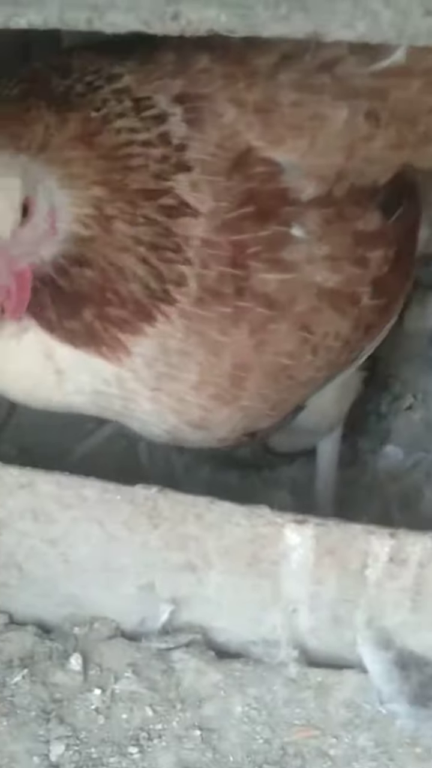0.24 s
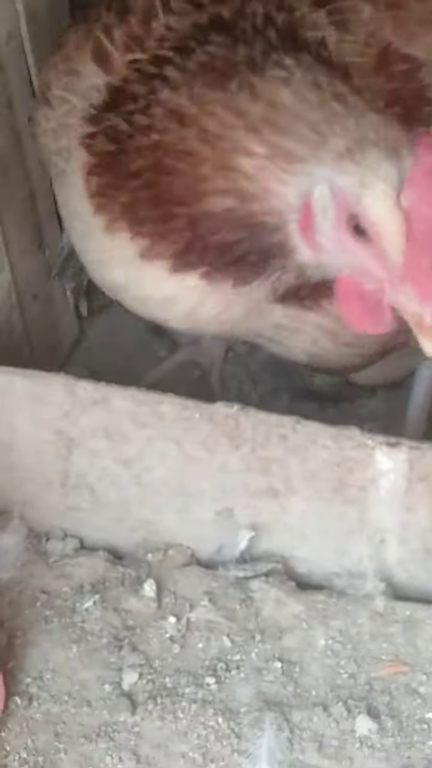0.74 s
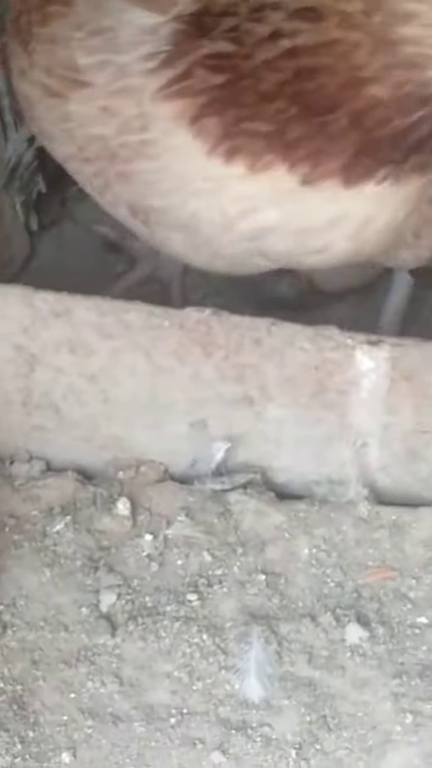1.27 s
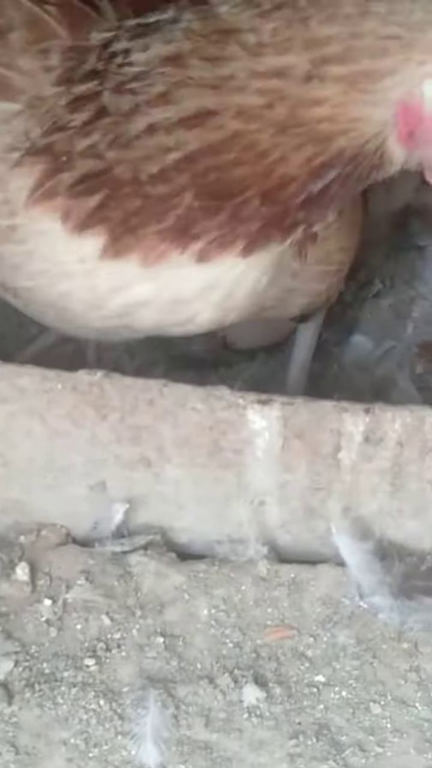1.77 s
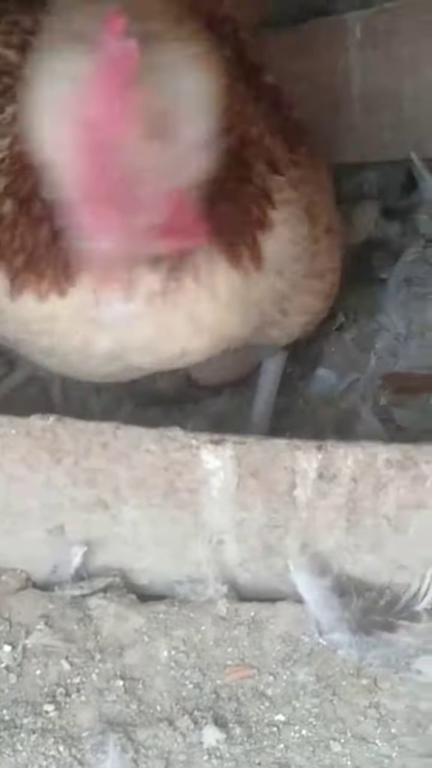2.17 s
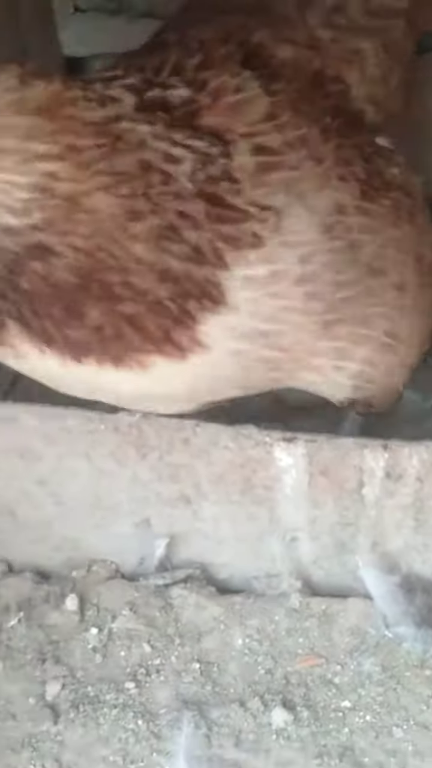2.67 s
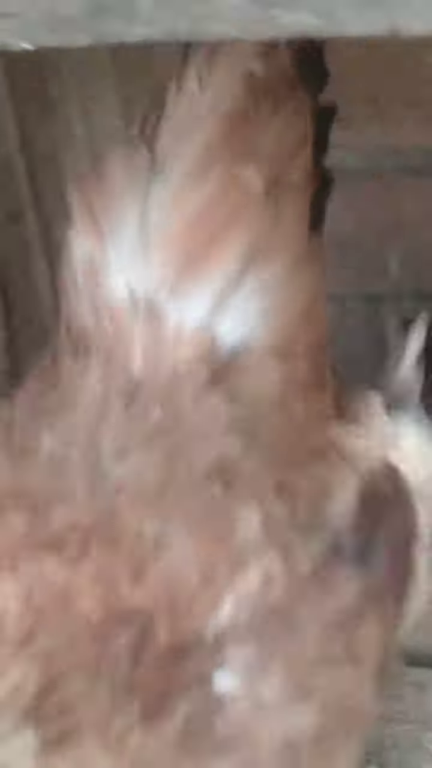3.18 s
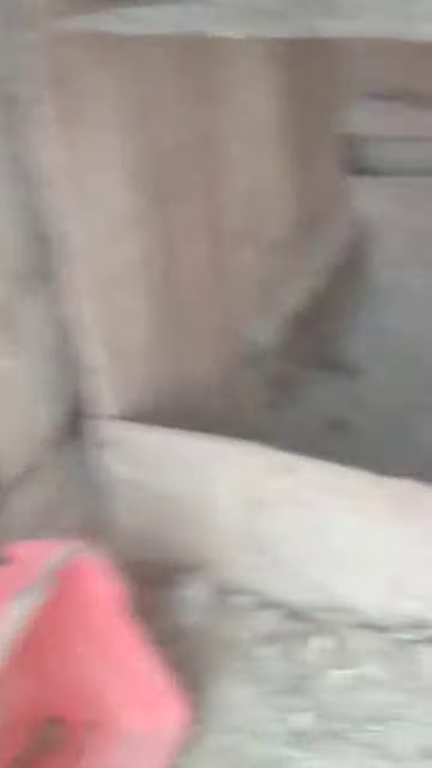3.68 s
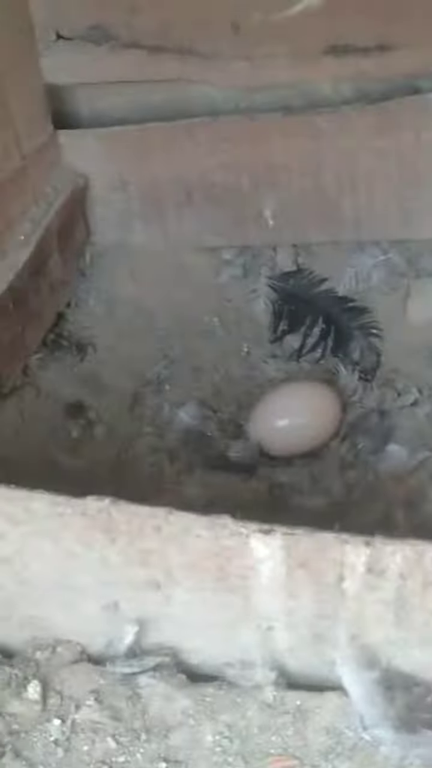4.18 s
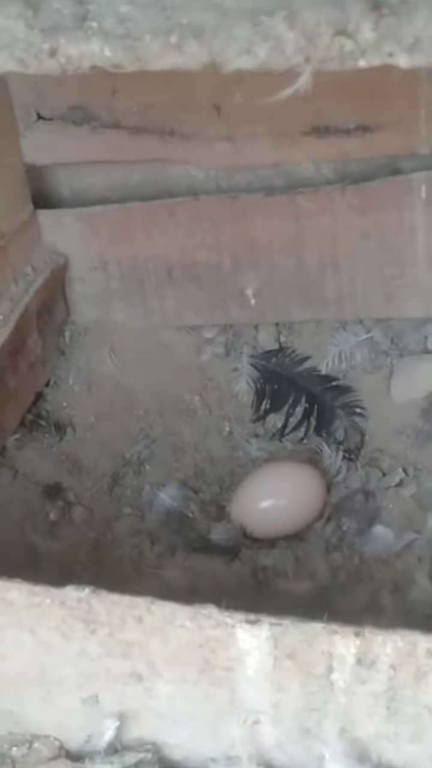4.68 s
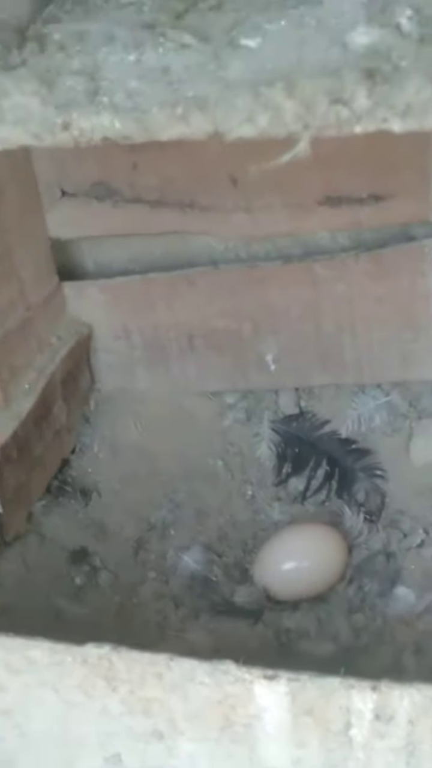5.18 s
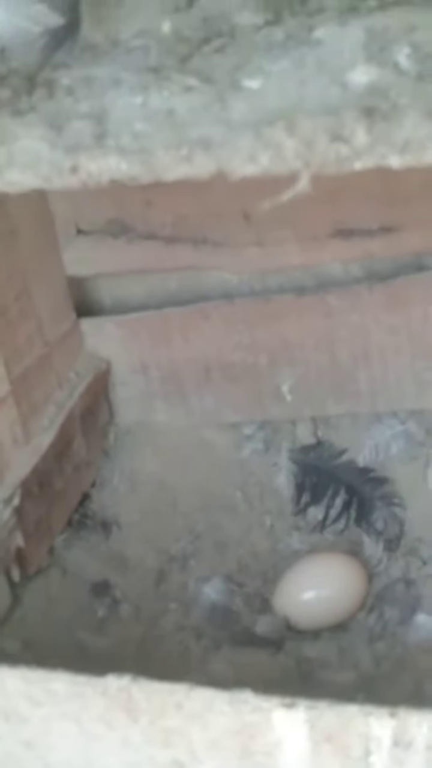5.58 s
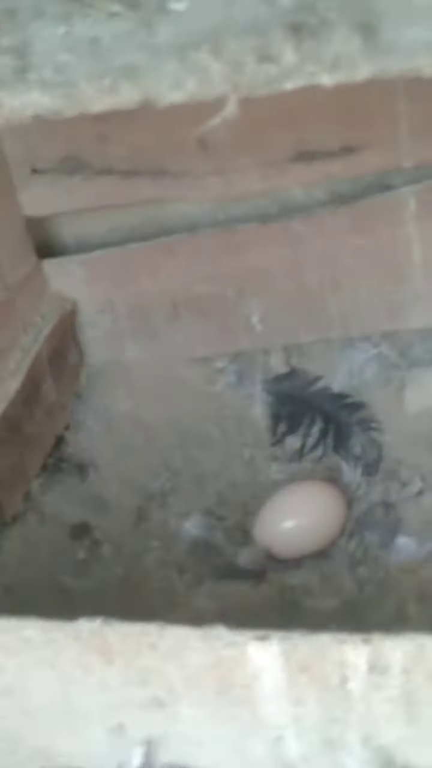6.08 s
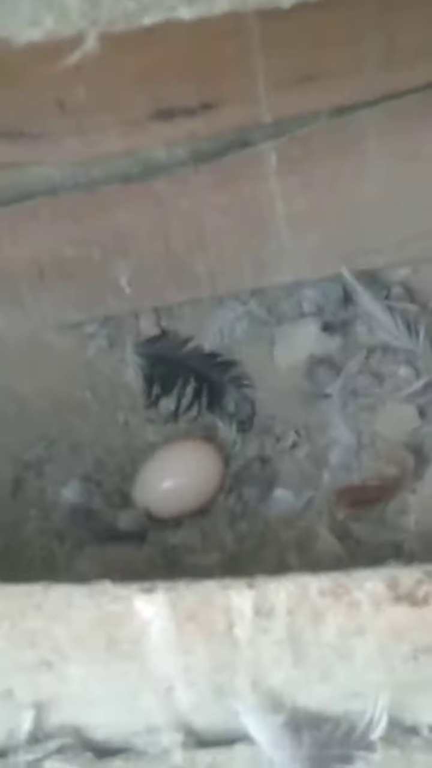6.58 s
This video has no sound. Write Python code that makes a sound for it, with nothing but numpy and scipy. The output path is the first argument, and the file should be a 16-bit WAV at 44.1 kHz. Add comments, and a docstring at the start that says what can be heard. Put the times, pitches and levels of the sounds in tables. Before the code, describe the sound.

For the first two seconds there is only soft outdoor air and a low, gently swelling rumble, with a faint far bird note at the start, a few tiny taps and a brief low swell near 1.2. A small cluck at 1.9 leads to a loud, bright squawk at 2.2-2.3. Short, round clucks follow at 2.45, 2.6, 2.8 and 3.0, close and ringing in the wooden box, with a sharp tick near 3.1. From 3.2 to 3.6 she rises with hoarse, broken squawks and a strong cluck. Small knocks and a soft thud come around 3.7-4.1. Now farther off, she cackles with raspy clucks and a cry at 4.3, a high falling squawk at 5.0 and a longer one at 5.3-5.6, echoing in the coop. A distant motor hums past, nearest around 5.7, while faint, evenly spaced clucks continue to the end near 6.8.

```python
"""Soft air and a low rumble, a far bird's faint note, a few small taps; then a hen clucks in a wooden nest box.
She squawks, steps out into the coop and cackles on from farther off as a distant motor hums past.
Her syrinx pulses and puffs of air pass throat and beak, breaking between clean notes and hoarse rasps.
First the box rings with her voice, then the coop echoes it; a limiter ducks the loudest cries."""
import sys
import numpy as np
from scipy import signal
from scipy.fft import rfft, irfft, next_fast_len
from scipy.io import wavfile
from scipy.ndimage import uniform_filter1d, minimum_filter1d, map_coordinates

SR = 44100
rng = np.random.default_rng(int(sys.argv[2]) if len(sys.argv) > 2 else 0)


def inscribe(sig):
    """Save sig as 16-bit PCM at rate SR to the path in sys.argv[1].

    A 1-D sig is mono; a 2-D sig holds one channel per row.
    Samples are clipped to [-1, 1] before scaling.
    """
    pcm = np.round(np.clip(np.atleast_2d(sig).T, -1, 1) * 32767)
    wavfile.write(sys.argv[1], SR, pcm.astype(np.int16))


N = 301574
TIME = np.arange(N) / SR
EDGE_HZ = 15900  # upper band limit
RISES_S, LEAVES_S, MOVE_WIDTH_S = 3.225, 3.586, 0.3  # she gets up, then clears the box; tanh width of each move
MOTOR_NEAREST_S = 5.71


def amp(db):
    """Decibels to gain."""
    return 10 ** (np.asarray(db) / 20)


def unit(x):
    """Scales to rms 1."""
    return x / np.sqrt(np.mean(x ** 2) + 1e-20)


def curves(rows, t):
    """The columns of a time table, read at times t."""
    s, *columns = np.transpose(rows)
    return [np.interp(t, s, c) for c in columns]


def read(points, hz):
    """A spectrum table on a log-frequency axis."""
    f, value = np.transpose(points)
    return np.interp(np.log(hz + 1), np.log(f), value)


def colour(x, points):
    """Filters x by a spectrum table."""
    size = next_fast_len(len(x) + 1024)
    gain = amp(read(points, np.fft.rfftfreq(size, 1 / SR)))
    return irfft(rfft(x, size) * gain, size)[:len(x)]


def wander(size, rate_hz):
    """Smooth chance of rms 1, no faster than about rate_hz."""
    knots = rng.standard_normal(4096)
    return unit(map_coordinates(knots, [np.arange(size) * rate_hz * 2 / SR], order=3, mode="wrap"))


def step(t, at_s, width_s):
    """A smooth move from 0 to 1 around a moment."""
    return 0.5 + 0.5 * np.tanh((t - at_s) / width_s)


def bell(at_s, width_s):
    """A smooth swell to 1 and back; the half width is to 1/e."""
    return np.exp(-((TIME - at_s) / width_s) ** 2)


def resonate(x, hz, width_hz):
    """A resonance of gain 1 that follows hz: shift down to 0 Hz, lowpass, shift back."""
    turn = np.exp(2j * np.pi * np.cumsum(hz * np.ones(len(x))) / SR)
    r = np.exp(-np.pi * width_hz / SR)
    return 2 * (turn * signal.lfilter([1 - r], [1, -r], x / turn + 1e-18)).real


def formant(x, hz, width_hz):
    """A resonance applied twice, for steep skirts."""
    return resonate(resonate(x, hz, width_hz), hz, width_hz)


def add(mix, s, sound):
    """Mixes a sound in at time s."""
    part = mix[round(s * SR):][:len(sound)]
    part += sound[:len(part)]


# relative spectrum of outdoor air: freq_hz [Hz], density_db [dB per Hz]
AIR_SPECTRUM = [(70, -34.5), (125, -8), (156, -2), (258, -8.5), (357, -20.5), (503, -13.5), (1200, -15.5),
                (2790, -24), (3850, -29.5), (4750, -33.5), (7500, -42.5), (10000, -43.5), (13000, -38.5),
                (15500, -48)]
# relative spectrum of the rumble: freq_hz [Hz], gain_db [dB]
RUMBLE_SPECTRUM = [(15, -42), (28, 3.5), (46, 1), (75, 8), (98, -1.5), (122, -12), (160, -18.5), (250, -16),
                   (400, -49.5), (1000, -86)]
# broad swells of the rumble: peak_s [s], half_width_s [s], swell_db [dB]
RUMBLE_GUSTS = [(1.4, 1, 5.5), (4.85, 0.29, 4.5), (5.8, .4, 3)]
# relative spectrum of the drone: freq_hz [Hz], gain_db [dB]
DRONE_SPECTRUM = [(100, -17), (150, 6), (200, -4), (260, -0.5), (400, -20), (1200, -50.5)]
AIR_DB, RUMBLE_DB, RUMBLE_WANDER_DB = -55.5, -48.5, 0.1
DRONE_DB, DRONE_SWELL_S = -56.5, 2.2
BUMP_S, BUMP_WIDTH_S, BUMP_DB = 1.16, 0.15, -48.5  # brief early swell of the drone


def background(linger_s=0.93):
    """Coloured noises: outdoor air, swelling rumble, and a drone that comes with the motor but slower."""
    air = amp(AIR_DB + 0.17 * wander(N, 6.4)) * unit(colour(rng.standard_normal(N), AIR_SPECTRUM))

    gusts_db = sum(db * bell(s, width_s) for s, width_s, db in RUMBLE_GUSTS)
    rumble_db = RUMBLE_DB + gusts_db + RUMBLE_WANDER_DB * wander(N, 1.49)
    rumble = amp(rumble_db) * unit(colour(rng.standard_normal(N), RUMBLE_SPECTRUM))

    drone_gain = amp(DRONE_DB) * bell(MOTOR_NEAREST_S + linger_s, DRONE_SWELL_S)
    drone_gain += amp(BUMP_DB) * bell(BUMP_S, BUMP_WIDTH_S)
    drone = drone_gain * unit(colour(rng.standard_normal(N), DRONE_SPECTRUM))
    return air + rumble + drone


def far_call(start_s=0.0404, length_s=0.366, hz=1250, db=-59):
    """A faint note from another bird far away: noise blurred around one pitch."""
    out, size = np.zeros(N), round(length_s * SR)
    note = unit(formant(rng.standard_normal(size), hz, 27))
    add(out, start_s, amp(db) * note * signal.windows.tukey(size, 0.4))
    return out


# taps, scuffs and soft thuds, and a faint far call at 1.976 s:
# start_s [s], level_db [dB before decay], centre_hz [Hz], width_hz [Hz], decay_s [s to 1/e]
TAP_EVENTS = [(0.106, -56, 4150, 3500, 0.066), (0.801, -59.5, 5000, 6000, 0.0061),
              (1.091, -59.5, 3500, 4000, .01), (1.976, -57, 2440, 800, .05),
              (2.689, -62, 6920, 7000, 0.0054), (3.061, -24, 2260, 900, 0.0023),
              (3.679, -51, 5000, 6070, 0.0071), (3.855, -39, 822, 600, 0.044), (3.86, -53, 240, 70, 0.026),
              (3.884, -46, 2500, 1300, 0.022), (4.091, -51, 230, 69, 0.044), (5.97, -49, 2952, 700, 0.023)]


def taps():
    """Short dying bursts of noise in one broad resonance: taps, scuffs, thuds and one faint far call."""
    out, t = np.zeros(N), np.arange(SR // 2) / SR
    for start_s, level_db, centre_hz, width_hz, decay_s in TAP_EVENTS:
        noise = colour(rng.standard_normal(len(t)), VOICE_SPECTRUM)
        burst = unit(formant(noise, centre_hz, width_hz))
        add(out, start_s, amp(level_db) * burst * np.exp(-t / decay_s))
    return out


# windpipe and beak resonances above the moving throat, before each call's factors:
# freq_hz [Hz], width_hz [Hz], gain_db [dB]
BEAK_RESONANCES = [(1983, 205, -1.5), (2549, 318, -0.5), (4130, 430, -6), (4640, 794, -10.5),
                   (5725, 440, -15.5)]
# overall colour of the voice: freq_hz [Hz], gain_db [dB]
VOICE_SPECTRUM = [(150, -57.5), (330, -10), (550, -3), (1200, 2), (4000, -4.5), (6500, -5), (9000, -4),
                  (13000, 3), (16000, -5.5)]


def voice(level_db, hz, rough, throat_hz, bright_db, fundamental_db, beak=1, damping=1, jitter=0.048,
          rasp=0.41, rasp_hz=130, breath=0.9, throat_width_hz=560, leak_db=-45, split=0.73):
    """Syrinx pulses and puffs of air pass throat and beak; a hoarse voice jitters and rattles."""
    size, rough = len(hz), np.clip(rough, 0, 1)
    turns = np.cumsum(hz * (1 + (0.0012 + jitter * rough) * wander(size, 240))) / SR

    pulses = np.zeros(size)
    for k in range(1, 30):
        phase = 2 * np.pi * k * turns - np.pi * k ** 2 / 10  # the long windpipe spreads each pulse
        pulses += np.cos(phase) * (k * hz < EDGE_HZ) / k ** 0.14
    pulses = unit(pulses)
    # strong and weak pulses alternate: lines at half the pitch
    pulses *= 1 + np.minimum(split * rough, 0.8) * np.cos(np.pi * turns)

    # air escapes once a cycle
    puffs = unit((0.4 + np.exp(-(turns % 1) / 0.14)) * rng.standard_normal(size))
    drive = (1 - 0.79 * rough) * pulses + (0.019 + breath * rough) * puffs

    rattle_turns = np.cumsum(rasp_hz * (1 + 0.17 * wander(size, 40.4))) / SR
    rattle = 1 + rasp * rough * np.sin(2 * np.pi * rattle_turns)

    low = formant(drive, throat_hz, throat_width_hz) + amp(fundamental_db) * formant(drive, hz, 400)
    high = amp(leak_db) * drive
    for freq_hz, width_hz, gain_db in BEAK_RESONANCES:
        high = high + amp(gain_db) * formant(drive, freq_hz * beak, width_hz * damping)
    sound = colour(low + amp(bright_db) * high, VOICE_SPECTRUM)

    # level the short-term power, so that level_db and the rattle shape it
    steady = sound / np.sqrt(abs(uniform_filter1d(sound ** 2, size=260)) + 1e-9)
    return amp(level_db) * steady * rattle * signal.windows.tukey(size, 260 / size)


# clucks: peak_s [s], level_db [dB, relative], top_pitch_hz [Hz], length_s [s], throat_hz [Hz],
# bright_db [dB, relative], beak [factor on beak resonances]
CLUCK_EVENTS = [(1.933, -31.5, 431, 0.037, 905, -31, 1.02), (2.116, -23.5, 559, 0.039, 814, -7.5, 0.86),
                (2.454, -10, 623, 0.045, 1077, -2, 0.898), (2.609, -16, 579, 0.045, 1200, -3, 0.88),
                (2.801, -21, 555, 0.043, 1196, -8.5, 1.07), (3.008, -25, 528, 0.042, 1060, -2.5, 1.05),
                (3.395, -14.5, 846, .064, 1060, 1, 0.84), (3.727, -34.5, 655, 0.11, 955, -0.5, 1.02),
                (3.922, -27.5, 569, 0.065, 1127, -8, 1.08), (4.128, -26, 607, .06, 1120, -19.5, 1),
                (4.471, -27.5, 605, 0.086, 1206, -6.5, .88), (4.56, -35.5, 736, .11, 725, 2.5, 0.87),
                (4.673, -26, 555, 0.088, 1090, -1, 0.83), (4.824, -33.5, 537, 0.1, 840, -4, 0.82),
                (4.888, -24, 605, 0.061, 1206, -5.5, 0.793), (5.737, -32, 606, .09, 1030, 1.5, 0.99),
                (5.951, -36.5, 567, 0.13, 1048, -4.5, 0.94), (6.143, -34.5, 616, 0.082, 1164, -3.5, 0.84),
                (6.336, -33.5, 605, 0.083, 1150, -6, 1.23), (6.527, -35.5, 539, 0.12, 1010, -2.5, 1.02),
                (6.743, -35, 603, 0.11, 950, -2.5, 1.02)]
# half-shut beak: freq_hz [Hz], gain_db [dB]
CLUCK_SPECTRUM = [(300, 7.5), (700, 3.5), (1200, -0.5), (2000, 1.5), (3700, 4), (5500, 0), (7000, 4.5),
                  (10000, 0.5), (14000, 3)]
# on the nest, then once she is up
CALM_RISE, ALARMED_RISE = 0.58, 0.48  # share of length spent swelling
CALM_ROUGH, ALARMED_ROUGH = 0.27, 0.64  # base roughness, 0-1


def clucks(scoop=0.18, sag=0.05, closing_db=1.5, fundamental_db=-9):
    """Each cluck swells and shuts; pitch scoops up to its top, and the closing beak dulls the end."""
    out = np.zeros(N)
    for peak_s, level_db, top_hz, length_s, throat_hz, bright_db, beak in CLUCK_EVENTS:
        alarm = step(peak_s, RISES_S, MOVE_WIDTH_S)
        rise_s = length_s * (CALM_RISE + (ALARMED_RISE - CALM_RISE) * alarm)
        fall_s = length_s - rise_s
        t = np.arange(-rise_s, fall_s, 1 / SR)
        stage = 2.15 * t / np.where(t < 0, rise_s, fall_s)  # negative while it swells
        arch = 1 / (1 + np.where(t < 0, scoop, sag) * stage ** 2)

        rough = CALM_ROUGH + (ALARMED_ROUGH - CALM_ROUGH) * alarm
        hoarse = rough + 0.14 * np.maximum(-stage, 0)  # the note catches roughly
        shine_db = bright_db - 2.5 - 2.8 * stage ** 2 - closing_db * stage
        swell_db = level_db - 10 * abs(stage) ** 1.3
        note = voice(swell_db, top_hz * arch, hoarse, throat_hz * arch, shine_db,
                     fundamental_db - 14 * rough, beak, damping=0.79, jitter=0.06, breath=0.95,
                     throat_width_hz=570, leak_db=-59)

        # only a sharp cluck reaches the top octave
        mellow = colour(note, [(5500, -1.0), (6800, -16.5)])
        add(out, peak_s + t[0], mellow + amp(-1.5 + 0.84 * bright_db) * (note - mellow))
    return colour(out, CLUCK_SPECTRUM)


# squawks: clears_s [s], breaks_s [s], rough [0-1], push_db [dB], throat [multiple of pitch],
# beak [factor on beak resonances], bright_db [dB], opening_db [dB brightness per s], fundamental_db [dB]
SQUAWK_EVENTS = [(2.205, 2.328, .04, 11.5, 2.03, 1.019, -0.5, 15, -26.5),
                 (3.259, 3.38, 0.52, -3.5, 1.15, 0.92, 5, 12, 2),
                 (3.488, 3.575, 0.43, 11, 2.2, 0.9, -1, -8, -20.5),
                 (4.273, 4.401, 0.18, -.5, 1.55, .96, 3, 9, -4),
                 (4.988, 5.069, 0.2, -2.5, 2.02, 0.96, 0.5, 8, -9),
                 (5.364, 5.567, 0.08, -1.5, 1.97, 1.067, 1, -10, -7.5)]
# course of each squawk: time_s [s], level_db [dB before push], pitch_hz [Hz]
SQUAWK_COURSES = [
    [(2.199, -13, 670.5), (2.225, -8.5, 692), (2.263, -24.5, 637), (2.289, -18, 663.4), (2.305, -22, 653.7),
     (2.327, -9.5, 685.5), (2.341, -28, 585)],
    [(3.24, -35.5, 677), (3.258, -28.5, 802), (3.294, -26.5, 785), (3.304, -24, 681), (3.33, -30.5, 697),
     (3.36, -33, 606)],
    [(3.484, -22.5, 716.7), (3.496, -10, 770), (3.506, -19, 573.5), (3.55, -26.5, 549.7),
     (3.556, -27, 569.4), (3.57, -18, 569.6), (3.588, -25.5, 614)],
    [(4.232, -33.5, 597.3), (4.264, -24.5, 615), (4.322, -24.5, 615.8), (4.404, -27, 621.0),
     (4.412, -32, 611)],
    [(4.982, -19, 891.2), (4.994, -15, 920.7), (5.008, -12.5, 1128), (5.036, -24.5, 1086),
     (5.064, -14.5, 982.3), (5.078, -12, 860.2), (5.092, -24.5, 804.3), (5.124, -12, 760.8),
     (5.152, -19.5, 740.0), (5.17, -23, 655.5), (5.18, -29, 639.8)],
    [(5.3, -38, 612.2), (5.32, -21.5, 626.4), (5.336, -33, 628), (5.346, -19.5, 657), (5.354, -32, 698),
     (5.372, -22.5, 935.6), (5.396, -23, 936.4), (5.5, -22.5, 901.4), (5.548, -18.5, 902.6),
     (5.585, -26, 897.4)],
]
# wide-open beak: freq_hz [Hz], gain_db [dB]
SQUAWK_SPECTRUM = [(350, -5.5), (640, 2), (1000, -0.5), (2000, -3), (3200, 4), (5000, -0.5), (7500, 4.5),
                   (10000, -1.5), (14000, -6.5)]
ATTACK_S, RELEASE_S, EDGE_DB = 0.011, 0.014, -48.5  # around each course; level at its outer ends
CLEAR_WIDTH_S, FRAY_WIDTH_S = 0.0028, 0.01  # tanh widths of clearing and breaking
HOARSE = 0.75  # roughness (0-1) outside the clear note
HOARSE_BRIGHT_DB, BROKEN_FUNDAMENTAL_DB = -7.5, -15.5  # hoarse is duller; broken loses its fundamental
STRAIN_TILT = 1  # dB of brightness lost per dB of swell in the clear note


def squawks():
    """Long cries break in hoarsely, clear into a note and break again; throat stays tuned to pitch."""
    out = np.zeros(N)
    for event, course in zip(SQUAWK_EVENTS, SQUAWK_COURSES):
        clears_s, breaks_s, rough, push_db, throat, beak, bright_db, opening_db, fundamental_db = event
        start_s, end_s = course[0][0], course[-1][0]
        t = np.arange(start_s - ATTACK_S, end_s + RELEASE_S, 1 / SR)
        level_db, hz = [uniform_filter1d(c, size=200) for c in curves(course, t)]
        edge = np.maximum((start_s - t) / ATTACK_S, 0) + np.maximum((t - end_s) / RELEASE_S, 0)
        edged_db = (level_db + push_db) * (1 - edge) + EDGE_DB * edge

        broken = step(t, breaks_s, FRAY_WIDTH_S)
        clear = step(t, clears_s, CLEAR_WIDTH_S) * (1 - broken)
        hoarse = HOARSE + (rough - HOARSE) * clear
        low_db = fundamental_db + BROKEN_FUNDAMENTAL_DB * broken
        shine_db = bright_db + opening_db * (t - t.mean()) + HOARSE_BRIGHT_DB * (1 - clear)
        shine_db = shine_db - STRAIN_TILT * clear * (level_db - np.median(level_db))

        cry = voice(edged_db, hz, hoarse, throat * hz, shine_db, low_db, beak, rasp=0.42, rasp_hz=122.15)
        add(out, t[0], cry)
    return colour(out, SQUAWK_SPECTRUM)


def dulled(x, treble_db):
    """Splits off the treble and sets its level, which follows her distance and the turn of her head."""
    body = colour(x, [(2500, 0), (4500, -8), (9000, -25)])
    return body + amp(treble_db) * (x - body)


def echo(x, decays, build_s):
    """Diffuse echo: sparse taps of random sign, each band dying at its own speed."""
    spikes = rng.choice([-1.0, 1.0], SR // 2) * (rng.random(SR // 2) < 0.08)
    hz, t, z = signal.stft(spikes, SR, nperseg=256)
    decay = amp(-60 * t / read(decays, hz)[:, None])
    tail = signal.istft(z * decay * (1 - np.exp(-t / build_s)), SR, nperseg=256)[1]
    return signal.fftconvolve(x, tail / np.linalg.norm(tail))[:N]


# distant motor: time_s [s], firing_rate_hz [Hz]
MOTOR_FIRING = [(4.4, 31), (4.95, 33.95), (5.45, 34.93), (5.9, 31.4), (6.15, 28.17), (6.5, 29.6),
                (6.84, 29.1)]
# exhaust that rings low: freq_hz [Hz], harmonic_db [dB, before waver and pass]
EXHAUST_RESPONSE = [(100, -61.5), (130, -81), (158, -50), (174, -51.5), (200, -63.5), (245, -61),
                    (310, -65), (370, -81)]
MOTOR_PASS_S = 0.58  # 3 dB down this long before and after the nearest point


def motor(waver_db=1.5):
    """A distant motor passes and eases off; its harmonics slide through the exhaust's resonance."""
    rate_hz, = curves(MOTOR_FIRING, TIME)
    turns = np.cumsum(rate_hz) / SR
    hum = np.zeros(N)
    for k in range(3, 12):
        gain = amp(read(EXHAUST_RESPONSE, k * rate_hz) + waver_db * wander(N, 5))
        hum += gain * unit(np.sin(2 * np.pi * (k * turns + rng.random())))
    return hum / np.hypot(1, (TIME - MOTOR_NEAREST_S) / MOTOR_PASS_S)


# level of her treble as she turns and moves: time_s [s], treble_db [dB]
TREBLE_COURSE = [(2.2, 6), (2.6, 8.5), (3.05, -6.5), (3.5, 1.5), (4.3, -2), (5.1, 0), (5.55, -5), (6.7, -9)]
# echoes off near boards: delay_s [s], gain [linear]
BOARD_ECHOES = [(.0031, 0.069), (.0087, -0.08), (0.0133, -.13), (0.0211, -0.011)]
# scatter off near walls: freq_hz [Hz], t60_s [s]
WALL_DECAYS = [(300, 0.12), (1200, 0.11), (5000, 0.072), (12000, 0.054)]
# echo of the coop: freq_hz [Hz], t60_s [s]
COOP_DECAYS = [(300, 0.76), (1200, 0.35), (2700, 0.27), (5000, 0.28), (12000, 0.12)]
IN_BOX_DB, IN_COOP_DB = (0, -12, -25.5), (-39.5, -5.5, -12.5)  # box ring, wall scatter, coop echo
RECEDE_DB_PER_S = 2  # outside, the echoes gain on her voice as she walks off


def scene(squawk_scatter_db=-8):
    """The hen with the ring of the box and the echoes of boards, walls and coop, over the background."""
    outside = step(TIME, LEAVES_S, MOVE_WIDTH_S)
    away_db = RECEDE_DB_PER_S * np.maximum(TIME - LEAVES_S, 0)
    box_db, walls_db, coop_db = [a + (b - a) * outside + away_db for a, b in zip(IN_BOX_DB, IN_COOP_DB)]

    treble_db, = curves(TREBLE_COURSE, TIME)
    soft = dulled(clucks(), treble_db) + taps()
    loud = dulled(squawks(), treble_db)
    hen = soft + loud

    boards = sum(gain * np.interp(TIME - delay_s, TIME, hen, left=0) for delay_s, gain in BOARD_ECHOES)
    box = formant(hen * amp(box_db), 1112, 58)
    # squawks sound drier, with less near-wall scatter than clucks
    scattered = soft + amp(squawk_scatter_db) * loud
    walls = echo(scattered * amp(walls_db), WALL_DECAYS, 0.00043)
    coop = echo(hen * amp(coop_db), COOP_DECAYS, 0.012)

    mono = hen + boards + box + walls + coop + background() + motor() + far_call()
    return np.array([mono, mono])


def record(dry, limit_db=-9, recovery_db_per_s=35):
    """A limiter falls at once on peaks and recovers slowly; then the band limit."""
    peak_db = 20 * np.log10(abs(dry).max(0) + 1e-9)
    recovery_db = recovery_db_per_s * TIME
    held_db = np.maximum.accumulate(peak_db + recovery_db) - recovery_db
    over_db = np.maximum(held_db - limit_db, 0)
    limited = dry * amp(uniform_filter1d(minimum_filter1d(-over_db, size=80), size=80))
    lowpass = signal.firwin(511, EDGE_HZ, window=("kaiser", 9), fs=SR)
    return signal.oaconvolve(limited, lowpass[None], "same")


dry = scene()
out = record(dry)
inscribe(out)
```